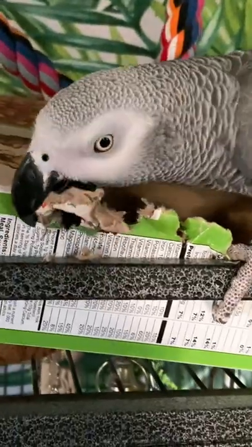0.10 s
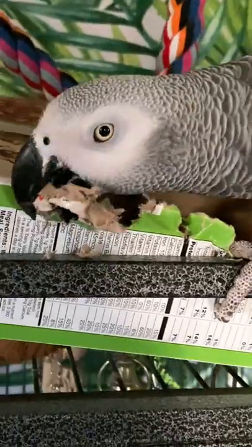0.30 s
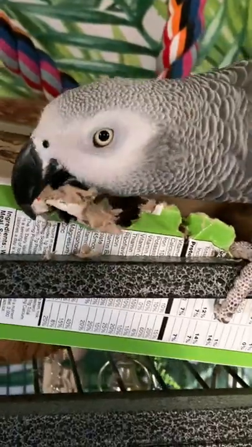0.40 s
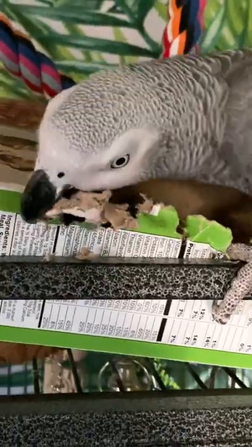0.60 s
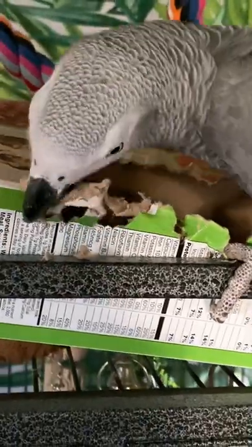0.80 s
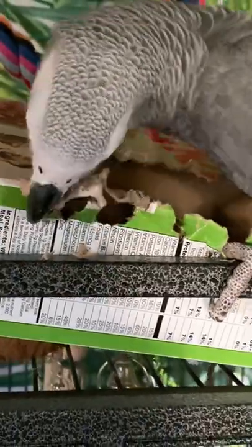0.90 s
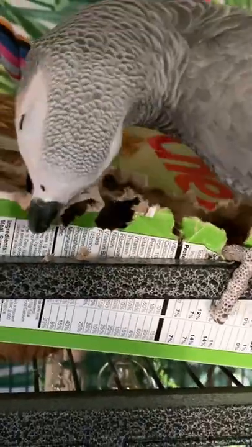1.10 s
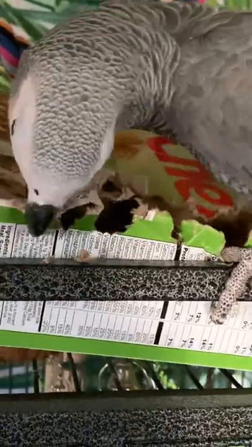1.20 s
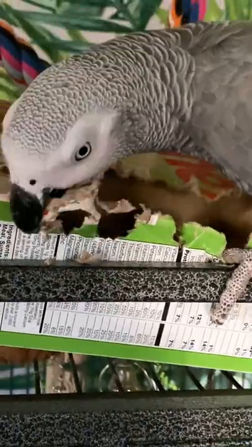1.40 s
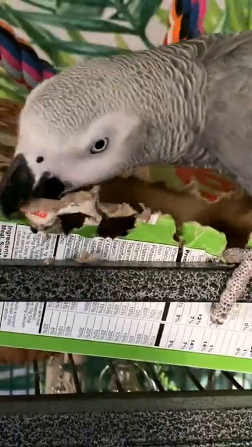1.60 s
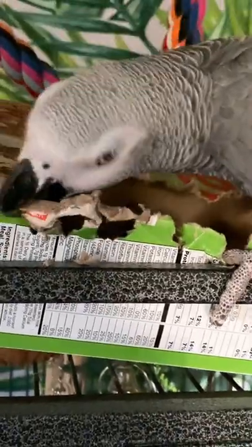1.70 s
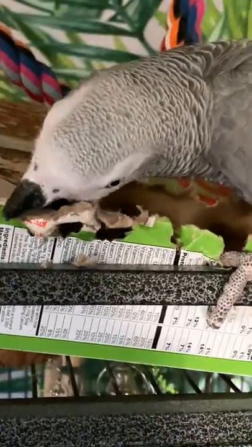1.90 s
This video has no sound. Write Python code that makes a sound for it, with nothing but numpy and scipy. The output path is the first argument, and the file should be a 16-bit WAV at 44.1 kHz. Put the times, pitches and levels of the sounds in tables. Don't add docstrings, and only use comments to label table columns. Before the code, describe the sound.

Parrot calls in an echoing room, two shrill swooping whistles with raspy distant squawks between

```python
import sys
import numpy as np
from scipy import signal
from scipy.fft import rfft, irfft
from scipy.io import wavfile
from scipy.ndimage import uniform_filter1d

SR = 44100
rng = np.random.default_rng(int(sys.argv[2]) if len(sys.argv) > 2 else 0)


def attenuation_scalar(level_db):
    decades = np.asarray(level_db, float) / 20
    return 10 ** decades


def dump_mix(stems):
    frames = np.atleast_2d(stems).T
    limited = np.clip(frames, -1, 1)
    pcm = np.round(limited * 32767).astype(np.int16)
    wavfile.write(sys.argv[1], SR, pcm)


N = 83790
TREBLE_LIMIT_HZ = 15850


def curve(rows, smooth_s=0.0013):
    s, *columns = np.transpose(rows)
    t = np.arange(N) / SR
    gate = np.clip(np.minimum(t - s[0], s[-1] - t) / 0.004 + 1, 0, 1)
    width = int(smooth_s * SR)
    return gate, *[uniform_filter1d(np.interp(t, s, c), width) for c in columns]


def at_hz(points, hz):
    p = np.array(points)
    return np.interp(np.log(hz), np.log(p[:, 0]), p[:, 1])


def rms_one(x):
    return x / np.sqrt(np.mean(x ** 2) + 1e-20)


def drift(rate_hz):
    r = np.exp(-2 * np.pi * rate_hz / SR)
    settle = 4000
    noise = rng.standard_normal(N + settle)
    return rms_one(signal.lfilter([1], [1, -2 * r, r * r], noise)[settle:])


def spectrum_hz():
    return np.arange(N // 2 + 1) * SR / N


def coloured(points, x):
    return irfft(rfft(x) * attenuation_scalar(at_hz(points, spectrum_hz() + 1)), N)


# (frequency [Hz], level [dB per Hz])
AIR_COLOUR = [(12, -47), (20, -17.5), (70, 2.5), (228, -9), (2200, -20), (2670, -31.5), (4180, -24),
              (6540, -39), (16000, -26.5)]
AIR_DB = -62.5
EARLIER_CALL_DB, EARLIER_CALL_HZ = -58.5, 2020


def air():
    t = np.arange(N) / SR
    steady = rms_one(coloured(AIR_COLOUR, rng.standard_normal(N)) * attenuation_scalar(drift(8)))
    edges = [EARLIER_CALL_HZ / 2.0, EARLIER_CALL_HZ * 1.27]
    band = signal.butter(2, edges, "band", fs=SR, output="sos")
    earlier_call = rms_one(signal.sosfilt(band, rng.standard_normal(N)))
    fading = attenuation_scalar(EARLIER_CALL_DB - 60 * t / 0.5)
    return attenuation_scalar(AIR_DB) * steady + fading * earlier_call


# (frequency [Hz], width [Hz], level [dB])
HOUSE_HUMS = [
    (46.3, 10, -67),
    (100, 4, -69.5),
]


def hums():
    hz, noise, out = spectrum_hz(), rfft(rng.standard_normal(N)), 0
    for centre_hz, width, db in HOUSE_HUMS:
        ringing = noise / (1 + (2 * (hz - centre_hz) / width) ** 2)
        out = out + attenuation_scalar(db) * rms_one(irfft(ringing, N))
    return out


# (frequency [Hz], half width [Hz], level [dB])
THROAT_RESONANCES = [(3700, 350, -3), (5900, 820, 1), (10300, 700, -4), (14200, 800, -5.5)]


def throat(hz):
    out = 0
    for centre_hz, width, db in THROAT_RESONANCES:
        out = out + attenuation_scalar(db) / (1 + np.abs((hz - centre_hz) / width) ** 3)
    return out


# (time [s], pitch [Hz], level [dB], overtone share [dB])
WHISTLES = [
    [(.097, 590, -55.5, -26), (.108, 650, -46, -39), (.122, 705, -44.5, -31), (.136, 707, -35, -38),
     (.143, 750, -45, -25)],
    [(.147, 826, -33, -31.5), (.166, 1637, -44.5, -29), (.19, 2950, -36.5, -7), (.205, 3833, -19.5, -37),
     (.215, 5250, -30, 0.5), (.234, 5573, -21, -10.5), (.27, 5800, -17, -29), (.293, 4205, -15.5, -18),
     (.318, 3185, -29, -14)],
    [(1.245, 600, -63, -36), (1.257, 630, -47, -36), (1.272, 714.6, -44.5, -34), (1.289, 713, -36.5, -33.5),
     (1.297, 750, -46, -26.5)],
    [(1.302, 824, -33, -29.5), (1.322, 1620, -42, -38), (1.345, 2850, -35, -2), (1.363, 3690, -20, -25),
     (1.374, 5378, -26, -3.5), (1.412, 5548, -18.5, -24), (1.431, 5710, -19.5, -28),
     (1.452, 4310, -13.5, -22.5), (1.476, 3243, -28.5, -9)],
]
OCTAVE_DB, TWELFTH_DB, OVERTONE_SLOPE_DB = -1, -7, 0.89
PURE_ABOVE_HZ = 1000
WOBBLE, FLUTTER_DB, BREATH_DB = 0.008, 4.5, -42


def whistle(rows):
    gate, hz, db, share_db = curve(rows, 0.006)
    hz = hz * (1 + WOBBLE * hz / 5000 * drift(150))
    phase = 2 * np.pi * np.cumsum(hz) / SR
    overtones = attenuation_scalar(OCTAVE_DB) * (hz / 5000) ** 2 * np.sin(2 * phase)
    overtones = overtones + attenuation_scalar(TWELFTH_DB) * (hz / 5200) ** 4 * np.sin(3 * phase)
    thinning = np.minimum(1, PURE_ABOVE_HZ / hz)
    for k in range(3, 23):
        gain = attenuation_scalar(OVERTONE_SLOPE_DB * k) * thinning * throat(k * hz) * (k * hz < SR / 2)
        overtones = overtones + gain * np.sin(k * phase + k * k)
    hiss = irfft(rfft(rng.standard_normal(N)) * throat(spectrum_hz()), N)
    breath = attenuation_scalar(BREATH_DB) * rms_one(hiss)
    tone = np.sqrt(2) * (np.sin(phase) + attenuation_scalar(share_db) * overtones)
    return gate * attenuation_scalar(db + FLUTTER_DB * hz / 5000 * drift(60)) * (tone + breath)


# (frequency [Hz], time to fall 60 dB [s])
ROOM_DECAY = [(700, 0.63), (1500, 0.79), (4000, 0.31), (8000, 0.41), (14000, 0.2)]
ECHO_BUILD_S = 0.002


def room_echo():
    t, echo = np.arange(SR) / SR, 0
    edges = 200 * 2 ** np.arange(0, 6.6, 0.5)
    for low, high in zip(edges, edges[1:]):
        sos = signal.butter(2, [low, high], "band", fs=SR, output="sos")
        band = signal.sosfilt(sos, rng.standard_normal(SR))
        echo = echo + band * attenuation_scalar(-60 * t / at_hz(ROOM_DECAY, np.sqrt(low * high)))
    echo = echo * (1 - np.exp(-t / ECHO_BUILD_S))
    return echo / np.sqrt(np.sum(echo ** 2))


# (time [s], pitch [Hz], level [dB])
CROON_PATH = [
    (.3, 1200, -45),
    (.322, 1426, -42.5),
    (.39, 1468, -51.5),
    (.47, 1678, -53),
    (.52, 1620, -98),
]


def croon():
    gate, hz, db = curve(CROON_PATH)
    wavering_hz = hz * (1 + 0.027 * drift(61))
    tone = np.sin(2 * np.pi * np.cumsum(wavering_hz) / SR)
    return gate * attenuation_scalar(db + 1.0 * drift(72)) * tone


# (frequency [Hz], level [dB])
BEAK_COLOUR = [(1400, -26), (2900, -4.5), (4400, -1), (5900, -2.5), (8600, -13.5), (11600, -6.5),
               (13200, -26.5), (15500, -20.5)]
JITTER, JITTER_HZ = 0.028, 70
RASP_DB, RASP_HISS_DB = 9.5, -2


def voice(hz, rough, half_db, quarter_db):
    hz = hz * (1 + JITTER * rough * drift(JITTER_HZ))
    phase = 2 * np.pi * np.cumsum(hz) / SR
    flutter = [drift(180) for _ in range(3)]
    tones = 0
    for k in range(1, 12):
        gain = attenuation_scalar(at_hz(BEAK_COLOUR, k * hz) + RASP_DB * rough * flutter[k % 3])
        tones = tones + gain * (k * hz < TREBLE_LIMIT_HZ) * np.sin(k * phase + k * k)
    half = attenuation_scalar(half_db) * (np.sin(phase / 2) + 0.53 * np.sin(phase + 1))
    return tones + half + attenuation_scalar(quarter_db) * np.sin(phase / 4)


# (time [s], pitch [Hz], level [dB], roughness [0-1], second voice [dB])
SQUAWKS = [
    [(.39, 1421, -56.5, 0.95, -4), (.44, 1507, -50.5, 0.73, -8), (.5, 1518, -47, 0.88, -31),
     (.53, 1484, -54.5, .6, 0), (.57, 1470, -88, 0.5, -1)],
    [(.622, 1283, -63, 0.7, 3.5), (.648, 1444, -41.5, 0.86, -7), (.68, 1510, -39, 0.68, -10.5),
     (.74, 1460, -33, .35, -35.5), (.775, 1476, -42.5, 0.58, -11), (.805, 1428, -54, 0.63, 2.5)],
    [(.815, 1415, -48, 0.7, -2.5), (.84, 1406, -35, 0.35, -21), (.9, 1431, -38.5, 0.4, -23),
     (.935, 1415, -44, 0.29, -24), (.99, 1366, -65.5, .4, 16)],
    [(1.834, 1285, -68, 0.4, 16.5), (1.848, 1307, -56, 0.4, 4.5), (1.866, 1512, -46.5, 0.6, 7),
     (1.88, 1437, -42, 0.6, -3), (1.9, 1448, -45, 0, 0)],
]
SECOND_VOICE_RATIO = 1.65


def squawk(rows):
    gate, hz, db, rough, second_db = curve(rows, 0.012)
    rough = np.clip(rough, 0.3, 1)
    first = voice(hz, rough, -39, -54.5)
    second = attenuation_scalar(second_db) * voice(SECOND_VOICE_RATIO * hz, rough, -10.5, -20.5)
    bursts = attenuation_scalar(RASP_DB * drift(264) / 2)
    hiss = rms_one(coloured(BEAK_COLOUR, rng.standard_normal(N)) * bursts)
    return gate * attenuation_scalar(db) * (first + second + attenuation_scalar(RASP_HISS_DB) * 2 * rough * hiss)


# (time [s], level [dB], pitch [Hz])
BEAK_TICKS = [
    (1.11, -49.5, 1840),
    (1.115, -49, 1600),
    (1.77, -77, 1700),
]


def ticks():
    t, out = np.arange(N) / SR, 0
    for s, db, hz in BEAK_TICKS:
        age = np.maximum(t - s, 0)
        out = out + attenuation_scalar(db - 60 * age / 0.011) * np.sin(2 * np.pi * hz * age)
    return out


NEAR_DIRECT_DB, NEAR_ECHO_DB = -0.5, -2.5
FAR_DIRECT_DB, FAR_ECHO_DB = -5, 0


def scene():
    near = sum(whistle(rows) for rows in WHISTLES) + ticks()
    far = sum(squawk(rows) for rows in SQUAWKS) + croon()
    near_echo = attenuation_scalar(NEAR_ECHO_DB) * signal.fftconvolve(near, room_echo())[:N]
    far_echo = attenuation_scalar(FAR_ECHO_DB) * signal.fftconvolve(far, room_echo())[:N]
    direct = near * attenuation_scalar(NEAR_DIRECT_DB) + far * attenuation_scalar(FAR_DIRECT_DB)
    return (direct + near_echo + far_echo + air() + hums())[None]


def low_pass(x):
    return signal.sosfilt(signal.butter(12, 16870, fs=SR, output="sos"), x)


OVERLOAD_TOP, OVERLOAD_SKEW = 0.42, 0.09


def record(dry):
    bent = dry / (1 + (dry / OVERLOAD_TOP) ** 4) ** 0.25
    no_bass = signal.butter(2, 150, "high", fs=SR, output="sos")
    bent = bent + OVERLOAD_SKEW * signal.sosfilt(no_bass, bent ** 2)
    no_top = signal.cheby2(12, 70, TREBLE_LIMIT_HZ + 900, fs=SR, output="sos")
    return low_pass(signal.sosfilt(no_top, bent))


dry = scene()
out = record(dry)
dump_mix(out)
```